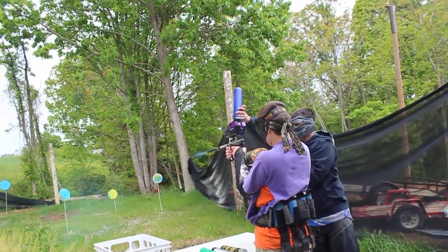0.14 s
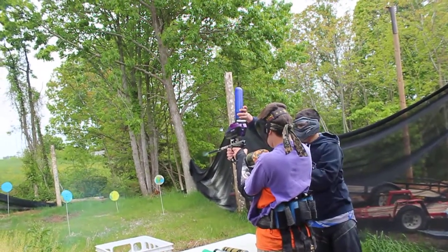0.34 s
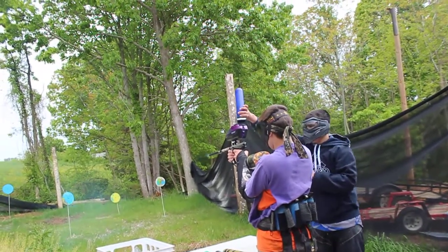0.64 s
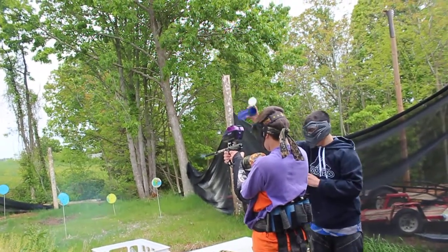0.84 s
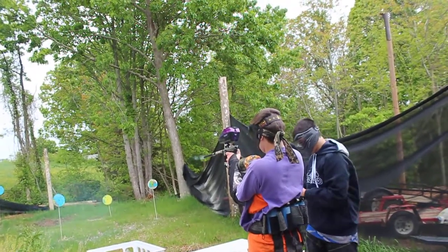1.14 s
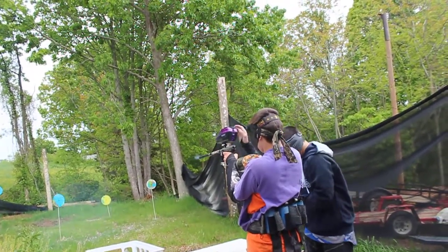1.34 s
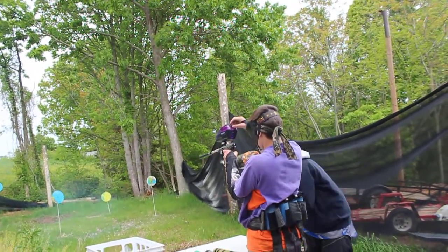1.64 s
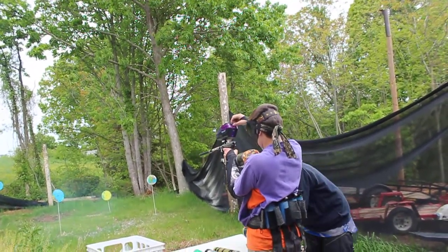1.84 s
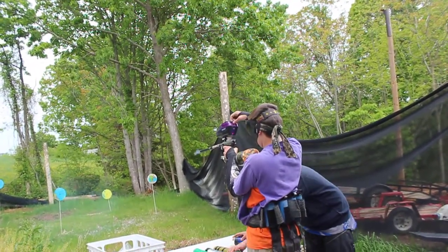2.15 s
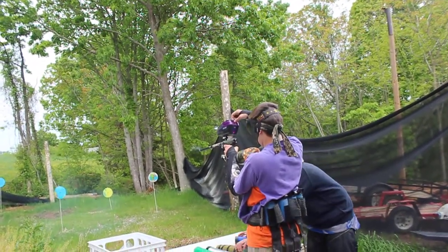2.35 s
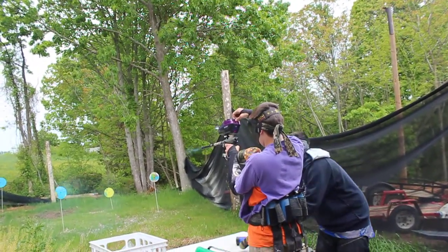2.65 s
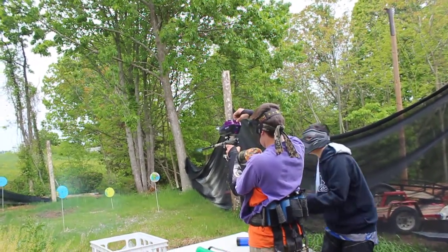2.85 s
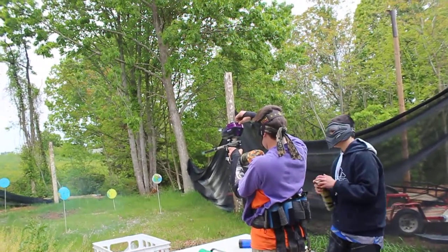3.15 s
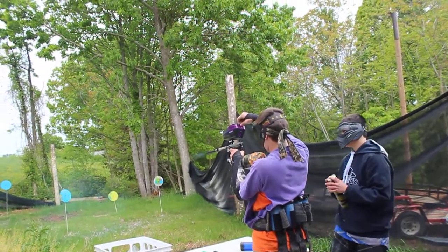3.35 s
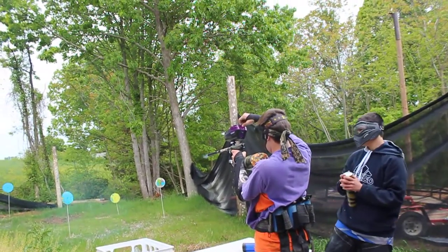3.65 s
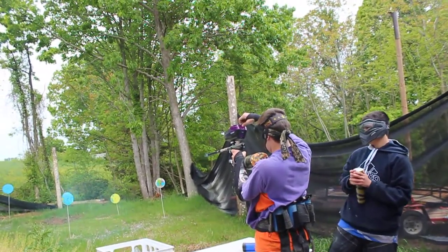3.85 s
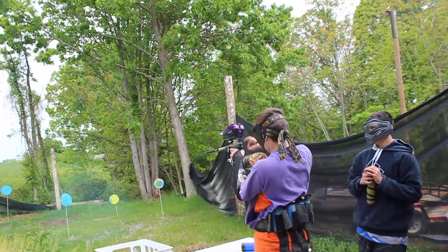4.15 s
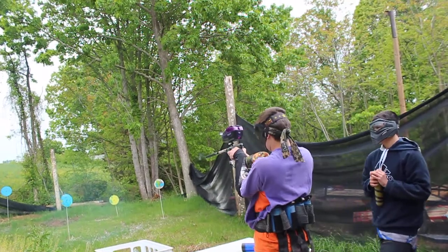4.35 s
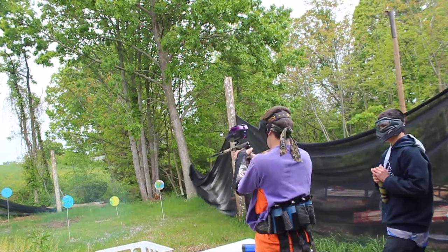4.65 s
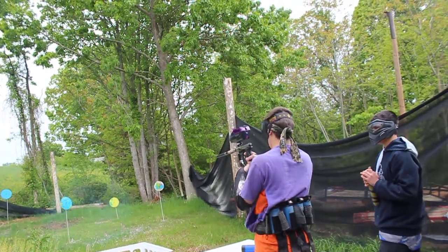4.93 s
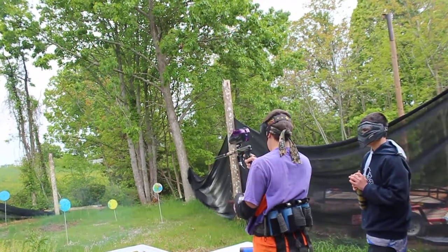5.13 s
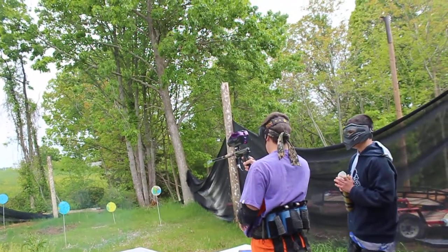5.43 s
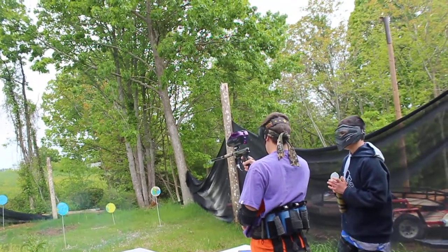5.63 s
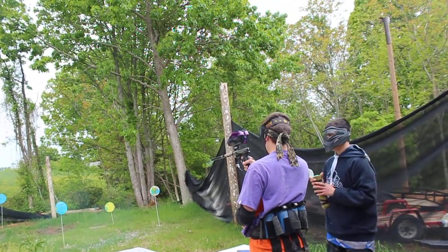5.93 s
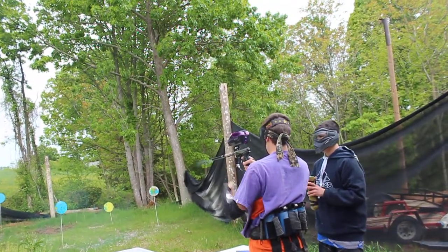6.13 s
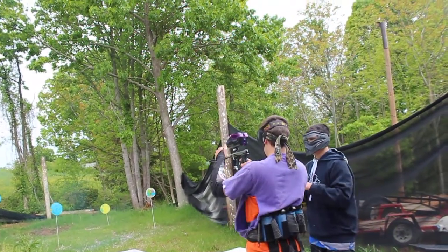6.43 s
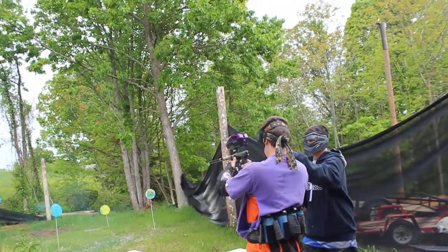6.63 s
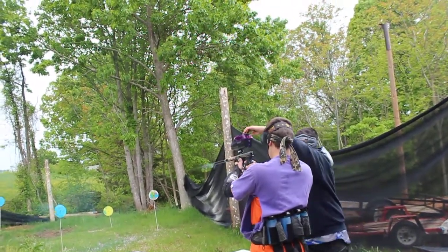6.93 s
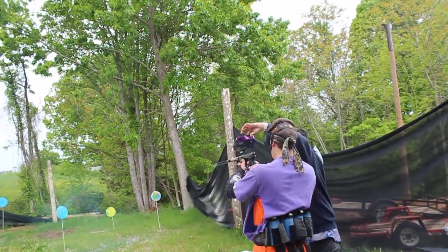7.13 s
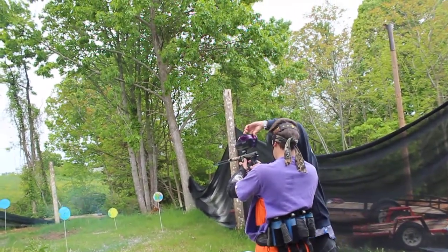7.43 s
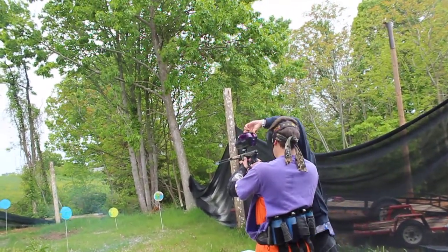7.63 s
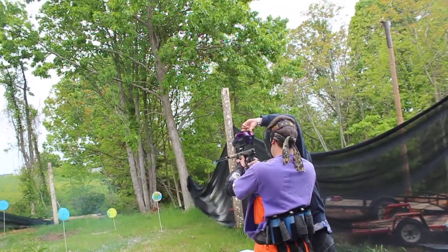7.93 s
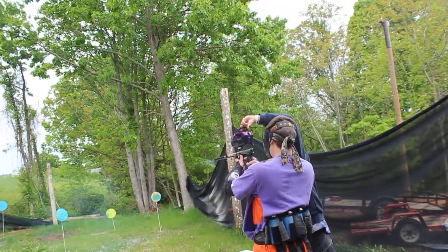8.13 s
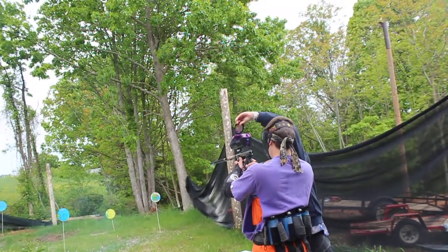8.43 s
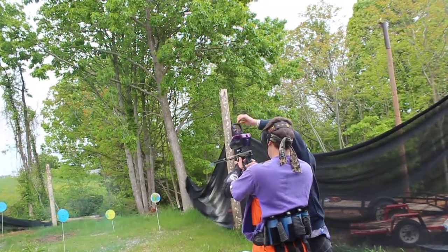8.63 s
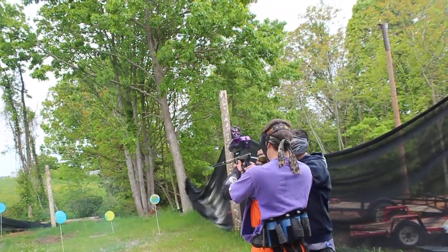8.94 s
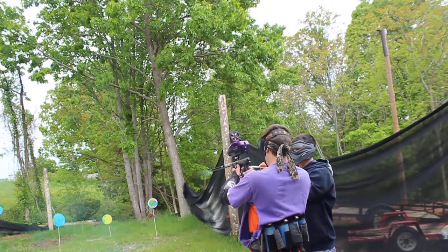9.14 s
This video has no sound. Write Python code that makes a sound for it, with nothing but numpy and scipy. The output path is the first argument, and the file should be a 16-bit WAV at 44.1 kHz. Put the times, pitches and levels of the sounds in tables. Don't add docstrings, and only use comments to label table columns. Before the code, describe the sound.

Already firing at 0 s, a close paintball marker hammers out sharp gas blasts about twelve a second until about 1 s, with balls cracking on metal targets that clank and ring. Two short pairs follow to 1.5 s. After a pause, a low gas burble and one shot come at 2.1 s, with a very loud, bright hit at 2.2. Strings run from 2.4 to 2.9 and 3.1 to 4.2 s. Then only dry ticks, a knock and shuffling gear over faint, swelling traffic, until a loud knock at 5.3. Isolated shots and rattles follow, with a piercing metallic hit near 5.7. A long string runs from 6.0 to 8.4 s, ringing densely, then another from 8.5 to the end with duller misses and late clanks near 9.1. Netting and trees scatter short echoes; the overloaded microphone ducks at shots and recovers in pauses.

```python
import sys
import numpy as np
from scipy import signal
from scipy.fft import rfft, irfft, next_fast_len
from scipy.io import wavfile
from scipy.ndimage import uniform_filter1d

SR = 44100
rng = np.random.default_rng(int(sys.argv[2]) if len(sys.argv) > 2 else 0)


def volts_from_db(level):
    exponent = np.asarray(level, float) / 20
    return 10 ** exponent


def file_out(sig):
    cols = np.atleast_2d(sig).T
    lim = np.clip(cols, -1, 1)
    pcm = np.round(lim * 32767).astype(np.int16)
    wavfile.write(sys.argv[1], SR, pcm)


N = 409232

# start_s, peak_db, across (0-1), up (0-1), clank_hz
TARGET_HITS = [(0.001, -27, 0.73, 0.74, 2750.0), (0.0718, -15, 0.21, 0.3, 4700),
               (0.1502, -8.5, 0.85, 0.26, 3440), (0.2314, -4, 0.87, 0.81, 2330),
               (0.3058, -3.5, 0.5, 0.2, 6500), (0.39, -4.0, 0.9, 0.83, 2340), (0.4663, -7, 0.18, 0.1, 2390),
               (0.5462, -4, 0.09, 0.11, 3540), (0.6324, -11, 0.7, 0.56, 4800),
               (0.7103, -8.5, 0.56, 0.83, 2130.0), (0.7847, -9, 0.06, 0.79, 2140.0),
               (0.8688, -9.5, 0.13, 0.85, 2120.0), (0.9448, -8.0, 0.35, 0.88, 3730),
               (1.0224, -4.5, 0.71, 0.88, 2430), (1.1107, -9, 0.81, 0.87, 4680.0),
               (1.4465, -4.5, 0.81, 0.8, 3560), (1.5292, -2.5, 0.21, 0.19, 3820),
               (2.219, 2.5, 0.73, 0.4, 4530.0), (2.5627, -1, 0.79, 0.13, 5000),
               (2.6485, -12, 0.17, 0.19, 3350.0), (2.8019, -8.5, 0.61, 0.21, 3500),
               (2.8878, -17, 0.89, 0.36, 2200), (2.9646, -7.5, 0.91, 0.85, 4580),
               (3.0412, -6.5, 0.12, 0.89, 2100.0), (3.2719, -5, 0.22, 0.18, 6900),
               (3.3445, -6, 0.8, 0.84, 3580), (3.419, -10, 0.87, 0.2, 5170.0),
               (3.5003, -11, 0.49, 0.61, 2390.0), (3.5854, -10, 0.88, 0.53, 2390),
               (3.6598, -5, 0.21, 0.78, 5200.0), (3.7459, -14.5, 0.79, 0.21, 2170.0),
               (3.8151, -4.5, 0.18, 0.81, 5100.0), (3.9098, -9, 0.0093, 0.44, 2390.0),
               (3.9835, -7.5, 0.25, 0.14, 3160), (4.0643, -6.0, 0.13, 0.6, 2400),
               (4.1467, -5, 0.58, 0.81, 2200), (4.2266, -13.5, 0.17, 0.19, 2430),
               (5.6755, 4.5, 0.01, 0.01, 5090), (5.9065, -4.5, 0.79, 0.2, 4230),
             (6.147, -5, 0.22, 0.21, 2190.0), (6.2234, -4, 0.87, 0.18, 2340),
             (6.5456, -6.5, 0.3, 0.045, 2180), (6.6287, -16, 0.83, 0.82, 2200),
             (6.7845, -4, 0.27, 0.12, 5950.0), (6.866, -3, 0.17, 0.83, 2370),
             (6.9444, -2, 0.13, 0.85, 2090.0), (7.0234, -13, 0.88, 0.12, 2180),
             (7.1026, -5, 0.49, 0.77, 3140), (7.1865, -12, 0.84, 0.31, 6000),
             (7.2686, -10, 0.13, 0.45, 2180), (7.344, -2.5, 0.88, 0.18, 2160.0),
             (7.4215, -8.5, 0.85, 0.16, 2530), (7.5051, -6, 0.33, 0.16, 2190),
             (7.8216, -5.5, 0.19, 0.15, 4500.0), (7.8946, -6.0, 0.23, 0.2, 2200),
             (7.9825, -3.5, 0.31, 0.2, 2140.0), (9.0693, -4, 0.77, 0.2, 2200),
             (9.1451, -5.5, 0.77, 0.2, 2170.0), (9.2298, -15, 0.19, 0.79, 3500.0)]
ALL_HITS = np.array(TARGET_HITS)


def along(points, hz):
    f, v = np.transpose(points)
    return np.interp(np.log(hz + 1), np.log(f + 1), v)


def filtered(x, response):
    m = next_fast_len(N + SR // 2)
    return irfft(rfft(x, m) * response(np.fft.rfftfreq(m, 1 / SR)), m)[:N]


def noise(colour):
    x = filtered(rng.standard_normal(N), lambda hz: volts_from_db(along(colour, hz)))
    return x / np.std(x)


def add(track, s, piece):
    i = round(s * SR)
    seat = track[max(i, 0):i + len(piece)]
    seat += piece[max(-i, 0):][:len(seat)]


def gain_at(gain, s):
    return gain[np.round((np.asarray(s) + .012) * SR).astype(int)]


def shot_times():
    # first_shot_s, last_shot_s, level_db (wake of the blast after gain control)
    pulls = [(.0176, 1.0572, -23), (1.144, 1.2247, -22.5), (1.3192, 1.4, -22.5), (2.0896, 2.0895, -17),
             (2.436, 2.9147, -21), (3.1349, 4.1732, -22.5), (5.314, 5.3141, -14.5), (5.551, 5.551, -15),
             (5.7725, 5.7728, -18), (6.0152, 8.4103, -22), (8.5397, 9.2581, -21.5)]
    cycle_s = .08
    rows = []
    for first, last, db in pulls:
        count = round((last - first) / cycle_s) + 1
        rows.append(np.c_[np.linspace(first, last, count), np.full(count, db)])
    return np.vstack(rows)


def shot_levels():
    duck_db, duck_s, scatter_db = -1, 0.041, .7
    s, db = shot_times().T
    since = s[:, None] - ALL_HITS[:, 0]
    held = ((since > 0) * volts_from_db(ALL_HITS[:, 1] / 2) * np.exp(-(since / duck_s) ** 2)).sum(axis=1)
    return np.c_[s, db + duck_db * held + scatter_db * rng.standard_normal(len(s))]


def dulled_late(gas, ms):
    dull_ms, dull_hz = 12, 3500
    late = np.zeros(N)
    for s in shot_times()[:, 0]:
        add(late, s, np.clip(ms[ms > 0] / dull_ms - 1, 0, 1)[:SR // 14])
    late = np.minimum(late, 1)
    return gas * (1 - late) + filtered(gas * late, lambda f: 1.36 / (1 + 1j * f / dull_hz))


def barrel_ring(fronts):
    # centre_hz, width_hz, level_db
    modes = [(71.4, 35, 21), (179, 92, 14), (289, 24, 15), (483, 107, 10.5), (628, 9.6, 2.5), (887, 26, 7),
             (1030, 53, -66), (1473, 750, 7), (2580, 110, 14)]
    return filtered(fronts, lambda f: 1 + sum(volts_from_db(db) * 1j * f * w / (c * c - f * f + 1j * f * w)
                                              for c, w, db in modes))


def radiated(x):
    # centre_hz, width_hz, level_db
    dips = [(120, 15, -7.5), (358.2, 94, -111), (755, 175, -6.5), (1236, 40, -61), (1954, 330, -9)]

    def response(f):
        out = (1j * f / (200 + 1j * f)) ** 3
        for c, w, db in dips:
            out = out * (c * c - f * f + 1j * f * w * volts_from_db(db)) / (c * c - f * f + 1j * f * w)
        return out
    return filtered(x, response)


def marker(gain):
    front_ms = [-1.5, 0, .35, 2.5, 3.25, 4.45, 4.95, 6.3, 7.95, 9.1, 12.5, 14, 17.1, 21.6]
    # strength, width_ms
    front_shapes = [(0.22, 0.083), (1.1, 0.17), (1.24, 0.034), (1.16, 0.066), (1.605, 0.25), (1.45, 0.13),
                    (1.3, 0.094), (0.86, 0.23), (1.06, 0.39), (1.45, 0.098), (0.28, 0.57), (1.3, 0.12),
                    (0.38, 0.11), (0.3, 0.12)]
    # time_ms, level_db
    gas_course = [(-1, -36), (-2, -7), (1.5, -11), (5.5, 3.5), (4.5, -11.5), (18, -7.5), (30, -21),
                  (42, -26.5), (74, -67)]
    # pitch_hz, level_db
    gas_colour = [(150, -4), (600, 5.5), (1600, -1.5), (3000, 3.5), (5000, -5), (7500, -4), (10000, -13),
                  (15500, -21)]
    # time_ms, level_db
    valve_course = [(-22.5, -70), (-26, -16), (-17, -23.5), (8, -34), (15, -39), (34, -21), (60, -72)]
    # pitch_hz, level_db
    valve_colour = [(500, -30), (2000, -7), (6000, -3), (12000, -1.5), (16000, -3)]
    puff_db, puff_ms, puff_fade_ms = -8.5, 0.2, 11.5
    crack_ms, crack_hz, crack_life_ms, crack_db = 3.9, 4630, 0.17, 10.5

    ms = np.arange(-24 * 44, 80 * 44) / SR * 1000
    at, size, width = np.c_[front_ms, front_shapes].T[:, :, None]
    spits = volts_from_db(3.1 * noise([(20, 6.0), (2500, -14.0), (6000, -34)]))
    fresh = spits * noise(gas_colour)
    same = (np.roll(spits, N // 2) * noise(gas_colour))[:len(ms)]
    gas_gain = volts_from_db(np.interp(ms, *np.transpose(gas_course)))
    valve_gain = volts_from_db(np.interp(ms, *np.transpose(valve_course)))

    fronts, repeats, puffs, leaks = np.zeros((4, N))
    for s, db in shot_levels():
        level = volts_from_db(db - gain_at(gain, s))
        late, strong = rng.standard_normal((2, len(front_shapes), 1))
        shape = size * volts_from_db(.9 * strong) * np.exp(-((ms - at - .015 * late) / width) ** 2)
        drag = size * volts_from_db(strong) * np.exp(-((ms - at) / puff_ms) ** 2 - at / puff_fade_ms)
        rush = level * (gas_gain + volts_from_db(puff_db) * drag.sum(axis=0))
        pop = ms - crack_ms - 0.047 * late[0]
        crack = volts_from_db(crack_db + 1.2 * strong[0]) * np.exp(-(pop / crack_life_ms) ** 2)
        crack = crack * np.sin(2 * np.pi * crack_hz * pop / 1000)
        start = s + ms[0] / 1000
        add(fronts, start, level * shape.sum(axis=0))
        add(puffs, start, rush)
        add(repeats, start, rush * same + level * crack)
        add(leaks, start, level * valve_gain)
    blast = volts_from_db(1.0) * barrel_ring(fronts)
    gas = dulled_late(volts_from_db(-1.5) * puffs * fresh + volts_from_db(0.5) * repeats, ms)
    return radiated(blast + gas) + leaks * noise(valve_colour)


def mode_levels():
    half_waves = [(0, 2), (2, 0), (3, 1), (0, 3)]
    ring_levels = [-28.5, -27.5, -27, -19.5]
    node_leak = .03
    across, up = ALL_HITS[:, 2:4].T
    rows = []
    for (m, n), db in zip(half_waves, ring_levels):
        motion = np.abs(np.cos(m * np.pi * across) * np.cos(n * np.pi * up))
        rows.append(db + 20 * np.log10(motion + node_leak))
    return np.array(rows)


def ringing(rings, loudness_db):
    family_hz = [
        [655, 504, 905, 1068],
        [1678, 2578],
        [1824, 1520, 1384],
        [2748, 2805, 3100],
    ]
    # level_db, t60_s
    family_decays = [
        [(-1.5, 1.48), (-14, 1.55), (-11.5, 0.57), (-9, 0.37)],
        [(3, 0.19), (-4.5, 0.33)],
        [(-0.5, 0.47), (-2, 0.19), (-21, 0.18)],
        [(-1, 0.19), (-13, 0.43), (-13, 0.23)],
    ]
    # pitch_hz, level_db, t60_s
    shimmer = [(2190, -9, .12), (2395, -10, .14), (3386, -10, .12), (3700, -9, .18), (4107, -11, .15),
               (4554, -9, .12), (5146, -10, .15), (5626, -12, .15), (5949, -9, .08), (6476, -12, .1),
               (7547, -13, .1), (612, -14, .4)]
    at, count = ALL_HITS[:, 0], len(ALL_HITS)
    clock = np.arange(N) / SR
    last = np.maximum(np.searchsorted(at, clock) - 1, 0)
    since = np.abs(clock - at[last])
    metal = np.zeros(N)
    swing = 1.6 * noise([(1, 0), (25, 0), (60, -40)])
    for pitches, family, ring_db in zip(family_hz, family_decays, rings):
        for k, (hz, (db, t60)) in enumerate(zip(pitches, family)):
            level = ring_db + db + 4 * (k > 0) * rng.standard_normal(count)
            sway = np.roll(swing, rng.integers(N))
            metal += volts_from_db(level[last] + sway - 60 * since / t60) * np.sin(2 * np.pi * hz * since)
    for hz, db, t60 in shimmer:
        level = (rings.max(axis=0) + loudness_db) / 2 + db - 13.5 + 3 * rng.standard_normal(count)
        metal += volts_from_db(level[last] - 60 * since / t60) * np.sin(2 * np.pi * hz * since)
    return metal


def bursts(gain, loudness_db, struck_db):
    # start_s, peak_db
    misses = [
        (2.414, -17),
        (5.529, -14),
        (8.3783, -11),
        (8.4563, -13),
        (8.9008, -11),
        (8.972, -15.5),
    ]
    # pitch_hz, level_db
    splat_colour = [(300, -20), (900, -2), (1800, -0.5), (3000, -1.5), (6000, -4), (9000, -9), (15500, -18)]
    miss_wake_db = -50
    u = np.arange(SR // 4) / SR
    crack, splash = np.zeros((2, N))
    missed = [(s, db - gain_at(gain, s), miss_wake_db - gain_at(gain, s)) for s, db in misses]
    for s, db, ring_db in [*zip(ALL_HITS[:, 0], loudness_db, struck_db), *missed]:
        add(crack, s, -volts_from_db(db) * np.sin(2 * np.pi * 3600 * u) * np.exp(-u / 0.0001))
        spray = volts_from_db(db - 9.5 - 60 * u / 0.0066)
        patter = volts_from_db((db + ring_db) / 2 - 4 - 60 * u / 0.045)
        wake = volts_from_db(ring_db - 25.5 - 60 * u / 0.88)
        add(splash, s, spray + patter + wake)
    return crack + splash * noise(splat_colour)


def targets(gain):
    # start_s, ring_db, clank_db
    accents = [
        (1.5292, -0.5, -3),
        (2.219, -2.5, 6.5),
        (3.2719, 0, 1),
        (4.2266, -4.5, -2),
        (5.9063, -0.5, 3),
        (7.4217, -3, -4),
    ]
    hard_db, hard_grows = 0.5, 0.61
    clank_db, clank_grows = -28, 0.58
    at, peak_db, _, _, clank_hz = ALL_HITS.T
    heard = gain_at(gain, at)
    extra_db = hard_grows * np.maximum(peak_db - hard_db, 0)
    soft_db, accent_db = sum(np.outer(db, np.abs(at - s) < .01) for s, *db in accents)
    rings = mode_levels() - heard + extra_db + soft_db
    metal = ringing(rings, peak_db - heard)
    u = np.arange(SR // 4) / SR
    fade = volts_from_db(0.5 - 60 * u / 0.052) + volts_from_db(-10.0 - 60 * u / 0.29)
    clanks_db = clank_db + clank_grows * peak_db + extra_db + accent_db - heard
    for s, db, hz in zip(at, clanks_db, clank_hz):
        add(metal, s, volts_from_db(db) * fade * np.sin(2 * np.pi * hz * u))
    sound = volts_from_db(2.0) * metal + bursts(gain, peak_db - heard, rings.max(axis=0))
    return filtered(sound, lambda f: (1j * f / (260 + 1j * f)) ** 2)


def gear(gain):
    # start_s, peak_db,
    # length_ms
    rattles = [
        (4.413, -23, 3),
        (4.42, -17.5, 2.4),
        (4.453, -15.5, 8.7),
        (4.458, -33, 80),
        (4.653, -42, 3),
        (5.294, -5.5, 5.4),
        (5.401, -27, 54),
        (5.597, -27, 5),
        (5.64, -26, 16),
        (5.86, -32, 33),
    ]
    # start_s, level_db, pitch_hz, length_s
    burbles = [
        (2.0672, -11, 610, .021),
        (2.147, -33, 610, .05),
    ]
    u, shakes = np.arange(SR // 8) / SR, np.zeros(N)
    for s, db, ms in rattles:
        level = volts_from_db(db - 7.5 - gain[round(s * SR)])
        add(shakes, s, level * (1 - np.exp(-u / 0.00048)) * np.exp(-2.2 * u * 1000 / ms))
    sound = shakes * noise([(1200, -5), (3000, 2.5), (7000, -2), (16000, -14)])
    rough = noise([(100, -9), (250, 1.0), (900, 0), (2000, -3), (6000, -24)])
    for s, db, hz, length in burbles:
        swell = volts_from_db(db - gain[round(s * SR)]) * np.sin(np.pi * np.minimum(u / length, 1)) ** 0.78
        burble = 1.23 * np.sin(2 * np.pi * hz * u) + .5 * np.sin(2 * np.pi * 0.423 * hz * u)
        add(sound, s, swell * (burble + 0.68 * rough[round(s * SR):][:len(u)]))
    return sound


def trees(x):
    # delay_s, level_db
    slaps = [
        (0.023, 10.5),
        (.062, -4),
        (0.086, -5),
    ]
    # pitch_hz, t60_s
    decay = [(200, 0.26), (1000, 0.34), (4000, 0.35), (12000, 0.24)]
    out = np.zeros(N)
    for share in np.arange(N) // (SR // 12) % 3 == np.arange(3)[:, None]:
        hz, t, z = signal.stft(rng.standard_normal(SR // 2), SR, nperseg=256)
        t60 = along(decay, hz)[:, None]
        fading = sum((t > s) * volts_from_db(db - 60 * (t - s) / t60) for s, db in slaps)
        tail = signal.istft(z * fading, SR, nperseg=256)[1]
        out += signal.fftconvolve(x * share, tail / np.linalg.norm(tail))[:N]
    return out


def field():
    # pitch_hz, level_db
    traffic = [(20, -29), (60, -13), (200, -11), (400, -10.5), (700, -6.5), (1000, -5), (1500, -11.5),
               (2200, -19.5), (4000, -28), (8000, -37.5), (16000, -43)]
    # time_s, level_db (before gain control)
    course = [(0, -20), (1.5, -43.5), (2, -40.5), (4.3, -32.5), (4.65, -34.5), (4.9, -30), (5.25, -36.5),
              (6, -29.5), (9.28, -37.5)]
    z = signal.stft(noise(traffic), nperseg=512)[2]
    patches = uniform_filter1d(rng.standard_normal(z.shape), size=4, axis=0)
    patches = uniform_filter1d(patches, size=8, axis=1)
    hum = signal.istft(z * volts_from_db(2.4 * patches / np.std(patches)), nperseg=512)[1][:N]
    return hum * volts_from_db(np.interp(np.arange(N) / SR, *np.transpose(course)))


def gain_db():
    fast_db, fast_s, slow_db, slow_s = -8, 0.1, -14, 1.0
    over, over_s, attack_s = 0.094, 0.024, 0.0054
    t, knocks = np.arange(N) / SR, np.r_[-.06, shot_times()[:, 0] + .004]
    last = np.searchsorted(knocks, t) - 1
    since = t - knocks[last]
    regained = slow_db * (1 - np.exp(-np.diff(knocks, prepend=-.14) / slow_s))
    aim = fast_db * np.exp(-since / fast_s) + slow_db * np.exp(-since / slow_s)
    aim += over * regained[last] * np.exp(-since / over_s)
    keep = np.exp(-1 / (attack_s * SR))
    return signal.lfilter([1 - keep], [1, -keep], aim, zi=[aim[0] * keep])[0]


def scene():
    gain = gain_db()
    shots, balls, small = marker(gain), targets(gain), gear(gain)
    echo = trees(volts_from_db(-19.0) * shots + volts_from_db(-16) * balls + volts_from_db(-13) * small)
    return (shots + balls + small + echo + field())[None]


def band_limit(x):
    return signal.sosfilt(signal.butter(12, 16850, fs=SR, output="sos"), x)


def record(dry):
    # pitch_hz, level_db
    band_edge = [(15700, 0), (16100, -14), (16800, -18), (16900, -80)]
    thump, thump_hz = 0.11, 89
    x = dry[0] * volts_from_db(gain_db()) + volts_from_db(-68) * rng.standard_normal(N)
    rectified = np.minimum(x * x, 1)
    x = x + thump * filtered(rectified, lambda f: 1j * f / (15 + 1j * f) / (1 + 1j * f / thump_hz) ** 2)
    x = x / (1 + np.abs(x) ** 8) ** (1 / 8)
    return band_limit(filtered(x, lambda hz: volts_from_db(along(band_edge, hz)))[None])


dry = scene()
out = record(dry)
file_out(out)
```